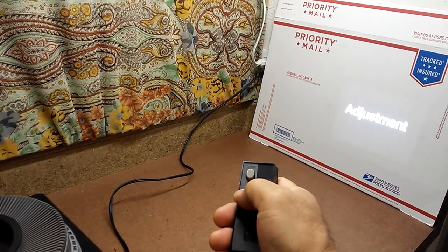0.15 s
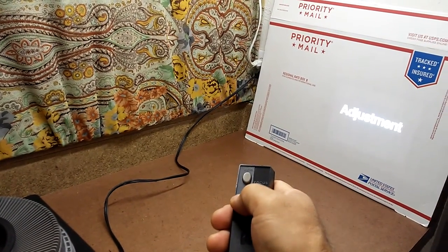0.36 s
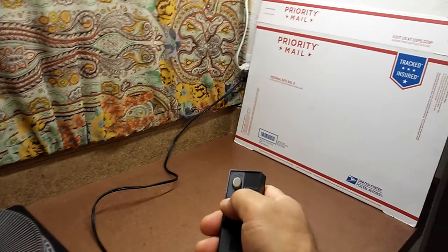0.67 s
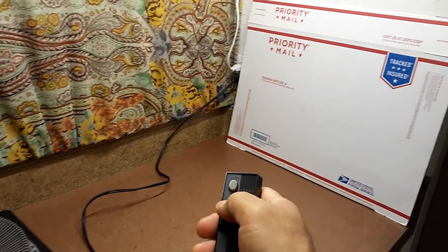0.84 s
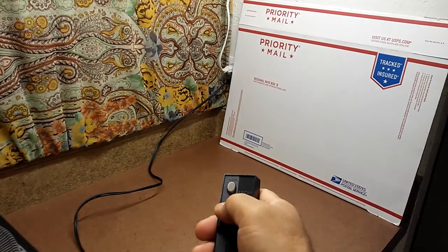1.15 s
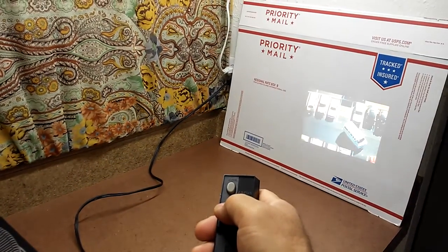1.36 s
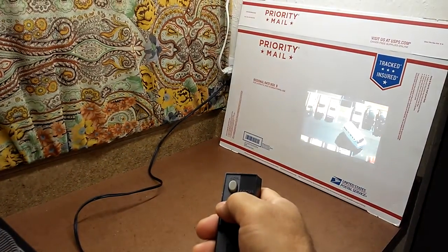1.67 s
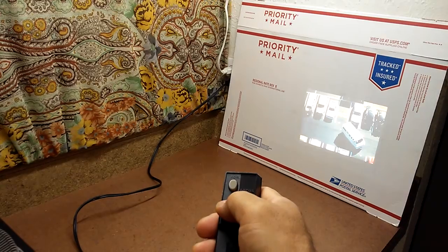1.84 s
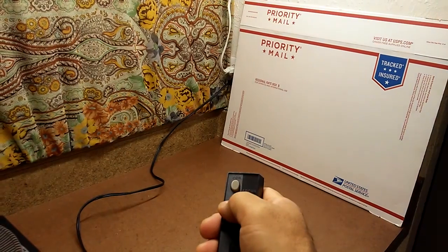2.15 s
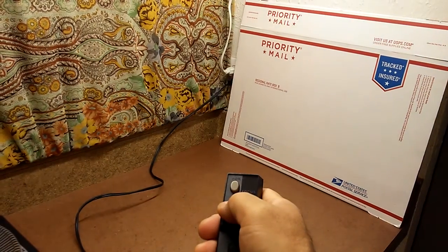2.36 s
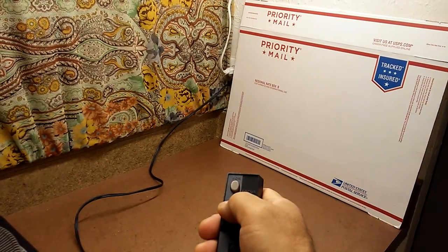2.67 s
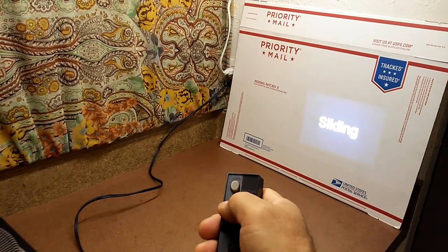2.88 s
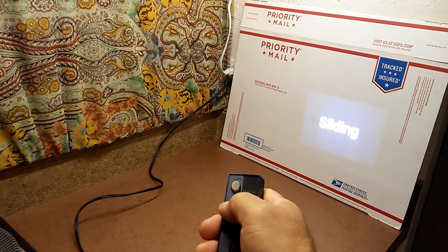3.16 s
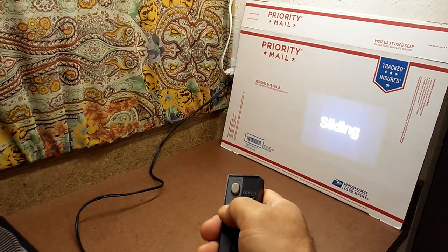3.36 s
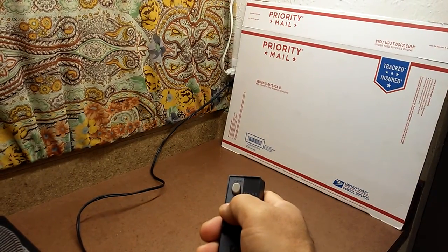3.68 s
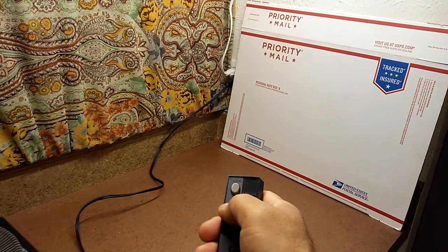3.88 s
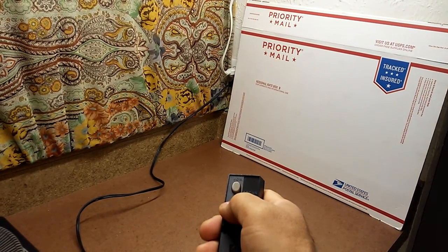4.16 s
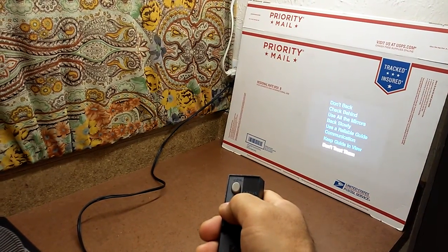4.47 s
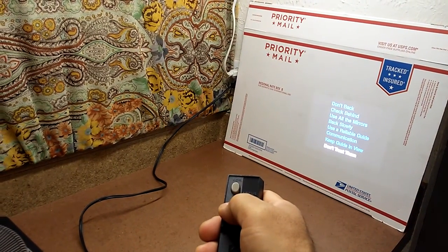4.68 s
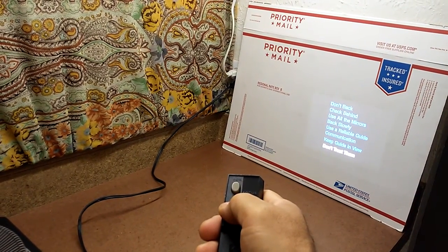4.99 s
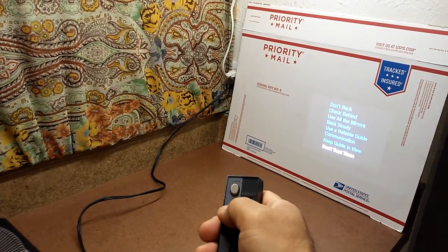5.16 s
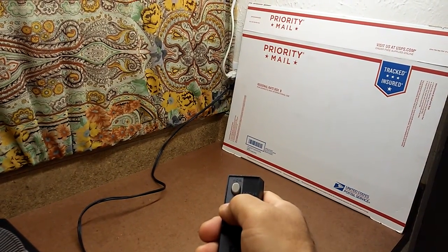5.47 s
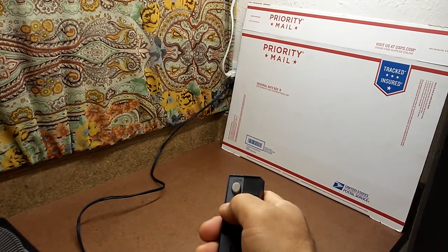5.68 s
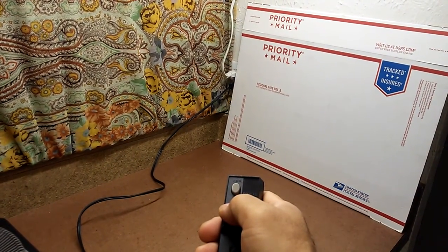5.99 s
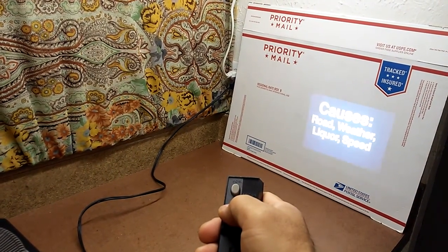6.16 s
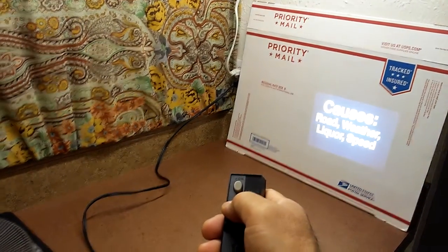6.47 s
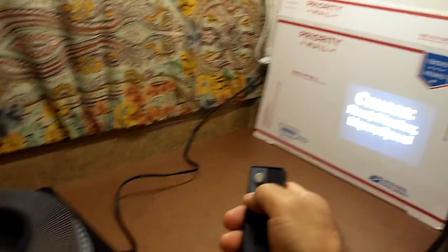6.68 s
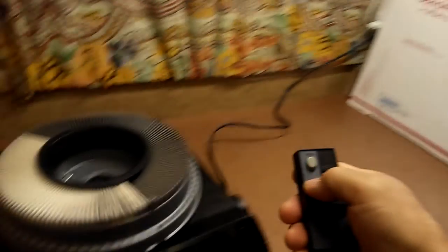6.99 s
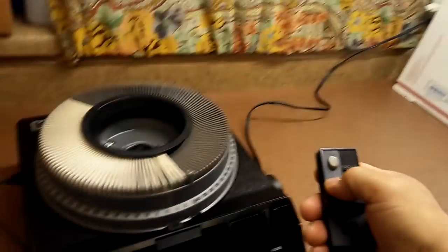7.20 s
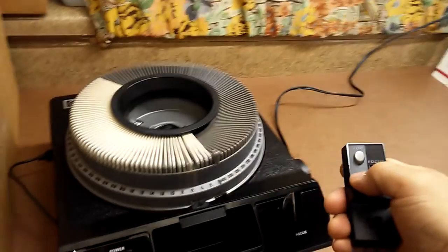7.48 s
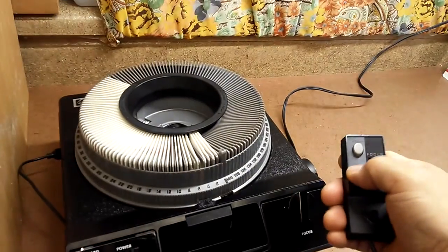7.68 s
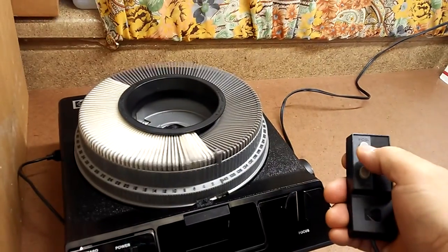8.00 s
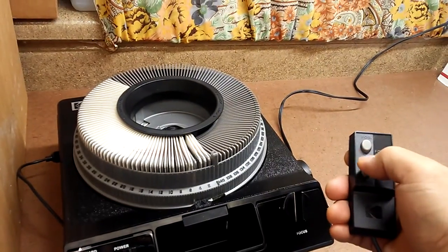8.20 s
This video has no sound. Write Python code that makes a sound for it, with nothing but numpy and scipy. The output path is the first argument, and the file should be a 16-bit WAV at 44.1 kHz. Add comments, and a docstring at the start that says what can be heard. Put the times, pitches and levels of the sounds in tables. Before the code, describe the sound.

Five mechanical slide changes go clack-clack, rattle, snap in a small furnished room, while a cooling fan whirs and a motor hums underneath.

```python
"""A round-tray slide projector on a desk steps through five slides in a small, furnished room.
Each change: two heavy lever clacks, the old slide landing, the tray bumping, the next slide catching, a bright latch snap.
Contacts are bursts of random clicks through ringing parts, with room echoes; a cam train grumbles beneath them.
Filtered noise makes the fan air and wavering sines the hum; near the end the microphone turns to face them."""
import sys
import numpy as np
from scipy import signal
from scipy.fft import rfft, irfft
from scipy.io import wavfile
from scipy.ndimage import uniform_filter1d

SR = 44100
rng = np.random.default_rng(int(sys.argv[2]) if len(sys.argv) > 2 else 0)


def unload_audio(sound):
    """Save the sound as a 16-bit wav file, at the path given as the first command line argument."""
    columns = np.transpose(np.atleast_2d(sound))
    # keep every value between -1 and 1, then stretch to whole-number steps
    steps = np.round(np.clip(columns, -1, 1) * 32767)
    wavfile.write(sys.argv[1], SR, steps.astype(np.int16))


N = 367794

# main beats of each slide change: shutter_clack_s, lifter_clack_s, latch_snap_s
CHANGES = [(0.443, 0.645, 1.178), (2.006, 2.183, 2.733), (3.38, 3.539, 4.118), (5.221, 5.398, 5.95),
           (7.579, 7.758, 8.303)]
# how each change differs, all offsets: clack_force_db, jiggle_db, landing_db, tray_bump_db, catch_db, last_knock_db
SLIDES = [(0, -23, -2, -1.5, -0.5, -5), (0.5, -8.5, 1, -1.5, 0.5, -5), (0, 3.5, -8, 1.5, -9.5, 0),
          (0.6, -3.5, -6.5, 1.5, -14, -6), (1.5, 1.5, 1.5, -5, -11, -3)]
# resonances of the plastic housing: pitch_hz, width_hz, level_db
HOUSING = [(431.6, 19, 9.5), (558, 23, 9), (905, 41, -4), (1190, 45, 0), (1580, 82, -6), (2070, 66, -4),
           (2630, 240, -9), (2870, 45, -2)]
# click colour of light plastic and linkage contacts: frequency_hz, density_db (per Hz)
RATTLE_TONE = [(70, -19.5), (170, -12), (260, 12), (350, 1.5), (580, 8), (850, 1.5), (1150, -3.5),
               (1600, 3), (2200, -1), (3000, -3), (4000, -8.5), (9500, -7), (12000, -11.5), (16000, -25)]
# click colour of a slide mount's contacts: frequency_hz, density_db (per Hz)
MOUNT_TONE = [(100, -18), (500, -10), (1000, -3.5), (1600, 0), (2300, -12), (3300, -6), (5000, 1.5),
              (9000, -8), (16000, -17)]
HOUSING_DB = -12  # ring of the housing against its click
THUMP_HZ, EDGE_HZ = 800, 3500  # a contact's thump lies below, its sharp edge above


def amp(db):
    """Decibels to gain."""
    return 10 ** (np.asarray(db) / 20)


def rms(x):
    """Root mean square."""
    return np.sqrt(np.mean(x ** 2) + 1e-20)


def read(points, hz):
    """A table of frequency and value, joined by lines on a log frequency axis."""
    f, value = np.transpose(points)
    return np.interp(np.log(hz + 1), np.log(f + 1), value)


def add(mix, s, sound):
    """Lays a sound into the mix at time s."""
    part = mix[max(round(s * SR), 0):][:len(sound)]
    part += sound[:len(part)]


def drift(hz):
    """Slow random motion of unit rms, fading out smoothly above about hz."""
    f = np.fft.rfftfreq(N, 1 / SR)
    x = irfft(rfft(rng.standard_normal(N)) * np.exp(-(f / hz) ** 2), N)
    return x / rms(x)


def band(x, hz, kind):
    """A causal band filter."""
    return signal.sosfilt(signal.butter(3, hz, kind, fs=SR, output="sos"), x)


def response(tone, modes, ring_db, size=8192):
    """One contact: a short coloured click, and the resonances that it leaves ringing."""
    tone_db = read(tone, abs(np.fft.fftfreq(size, 1 / SR)))
    log_gain = np.log(amp(np.maximum(tone_db, -80)))
    # minimum phase packs the click's energy at its start
    click = np.fft.ifft(np.exp(np.conj(signal.hilbert(log_gain)))).real
    t = np.arange(size) / SR
    ring = np.zeros(size)
    for hz, width, db in modes:
        ring += amp(db) * width * np.exp(-np.pi * width * t) * np.cos(2 * np.pi * hz * t)
    return click / rms(click) + amp(ring_db) * ring / rms(ring)


def contacts(size, per_s, uneven_db):
    """Tiny impacts at random moments, of random sign and strength."""
    hit = rng.random(size) < per_s / SR
    sign = rng.choice([-1, 1], size)
    strength = np.clip(rng.standard_normal(size), -2, 2)
    return hit * sign * amp(uneven_db * strength)


def blow(body, db, thump_db, edge_db, rise, decay, per_s, uneven_db, lag=0, size=11000):
    """Loose parts chatter in a burst that swells and dies; the lower bands follow the edge by lag seconds.

    Thump and edge levels are relative to the middle band; rise and decay are in seconds."""
    t = np.arange(size) / SR
    force = (1 - np.exp(-(t / rise) ** 2)) * np.exp(-t / decay)
    force /= force.max()
    sound = signal.fftconvolve(force * contacts(size, per_s, uneven_db), body)[:size]
    thump = band(sound, THUMP_HZ, "low")
    middle = band(sound, [THUMP_HZ, EDGE_HZ], "band")
    edge = band(sound, EDGE_HZ, "high")
    out = amp(edge_db) * edge / rms(edge)
    add(out, lag, middle / rms(middle) + amp(thump_db) * thump / rms(thump))
    # a longer burst carries more energy
    return amp(db) * rms(force) * out


def facing():
    """How far the microphone faces the machine, 0-1, at every sample."""
    # turning of the microphone: time_s, share (0-1)
    turns = [(0, 0.03), (.5, 0.2), (1.5, 0.03), (6.4, 0.01), (6.8, 0.11), (7.25, 0.85), (8.3, 1)]
    return np.clip(np.interp(np.arange(N) / SR, *np.transpose(turns)), 0, 1)


def air(tone, db):
    """Fan noise coloured by the vent's resonances; db is its level from 300 Hz up."""
    # resonances of the vent: pitch_hz, width_hz, lift_db
    vent = [(60.7, 38, 20), (810, 460, 4), (564, 34, 4.5), (1200, 26, -3), (4300, 600, 5.5),
            (8880, 1180, 9), (9830, 650, 5.5), (13100, 700, 8)]
    f = np.fft.rfftfreq(N, 1 / SR)
    vent_db = sum(lift_db * np.exp(-(2 * (f - hz) / width) ** 2) for hz, width, lift_db in vent)
    x = irfft(rfft(rng.standard_normal(N)) * amp(read(tone, f) + vent_db), N)
    return amp(db) * x / rms(band(x, 300, "high"))


def motor():
    """Fan air fluttering slightly over wavering hum lines, both stronger once the microphone faces them."""
    # fan air with the microphone turned away, then facing: frequency_hz, density_db (per Hz)
    away_tone = [(20, -42), (55, -16.5), (100, -8), (190, -10), (260, 1.5), (570, 0.5), (950, -8.5),
                 (1150, -9), (1450, -10.5), (3400, -17.5), (6000, -21.5), (9000, -22.5), (10800, -26),
                 (16000, -34.5)]
    facing_tone = [(20, -52), (60, -20), (150, -16), (260, -3.5), (330, -12.5), (510, -3.5), (630, -36),
                   (800, -11.5), (1080, -7), (1500, -21), (2200, -17.5), (3500, -27), (8800, -26),
                   (11000, -30), (16000, -42)]
    # lines of the motor and the fan blades, one list each: pitch_hz, level_db, gain_when_faced_db
    hum_hz = [120, 175, 240, 1092, 1160, 1280]
    hum_db = [-56, -59, -49.5, -67, -56.5, -68]
    hum_facing_db = [1, 5.5, 6, 15.5, 0, 8]
    flutter_db, waver_db, wobble_rad = .3, .6, .12  # rms swing of air level, hum level and hum phase

    t, faced = np.arange(N) / SR, facing()
    wind = np.sqrt(1 - faced) * air(away_tone, db=-46)
    wind += np.sqrt(faced) * air(facing_tone, db=-44)
    hum = np.zeros(N)
    for hz, db, faced_db in zip(hum_hz, hum_db, hum_facing_db):
        gain = amp(db + faced_db * faced + waver_db * drift(hz=6.1))
        hum += gain * np.sin(2 * np.pi * hz * t + wobble_rad * drift(hz=3.9))
    # a sine's peak is sqrt(2) times its rms
    return wind * amp(flutter_db * drift(hz=22)) + np.sqrt(2) * hum


def eddies(level_db=-55, gusty_db=5.5, faced_db=-6):
    """The fan's outflow flutters in brief, hollow puffs, weaker once the microphone has turned."""
    puffs = band(rng.standard_normal(N), [460, 640], "band") * amp(gusty_db * drift(hz=25))
    return amp(level_db + faced_db * facing()) * puffs / rms(puffs)


def cam(scrape_db=-49, grumble_db=-44, ticks_db=-53):
    """Gears grumble and scrape unevenly, and loose mounts tick, for as long as a change lasts."""
    run_up_s, run_on_s = 0.0086, 0.31  # before the shutter clack, after the snap
    t = np.arange(N) / SR
    running = np.zeros(N)
    for shutter_s, _, snap_s in CHANGES:
        running += (t > shutter_s - run_up_s) & (t < snap_s + run_on_s)
    # soften the starts and stops
    running = uniform_filter1d(running, size=3000)

    gears = response(RATTLE_TONE, HOUSING, HOUSING_DB)
    scrape = signal.oaconvolve(contacts(N, per_s=2500, uneven_db=4), gears)[:N]
    scrape = scrape * amp(2.4 * drift(hz=28))
    grumble = band(scrape, [270, 750], "band")
    mounts = response(MOUNT_TONE, HOUSING, HOUSING_DB)
    ticks = signal.oaconvolve(contacts(N, per_s=110, uneven_db=1), mounts)[:N]
    layers = [(scrape_db, scrape), (grumble_db, grumble), (ticks_db, ticks)]
    return running * sum(amp(db) * x / rms(x) for db, x in layers)


def levers(shutter_db=-21, lifter_db=-21.0, slack_db=-44, slack_s=0.011,
           rebound_db=-41, rebound_s=.058, shudder_db=-35, shudder_s=.038):
    """The shutter ticks through its slack, slams and rebounds; then the lifter slams on its stop and shudders."""
    # click colour of the heavy levers: frequency_hz, density_db (per Hz)
    clack_tone = [(60, -18), (110, -6.5), (160, -9), (205, -5), (250, 10.5), (330, 3.5), (540, 5), (660, 2),
                  (900, -0.5), (1600, -1), (2500, -5.5), (9500, -4.5), (13500, -13.5), (16000, -21)]
    body, out = response(clack_tone, HOUSING, HOUSING_DB), np.zeros(N)
    for (shutter_s, lifter_s, _), (force_db, *_) in zip(CHANGES, SLIDES):
        slack = blow(body, slack_db, thump_db=-3, edge_db=4,
                     rise=0.0013, decay=0.0051, per_s=13000, uneven_db=-1)
        add(out, shutter_s - slack_s, slack)
        slam = blow(body, shutter_db + force_db, thump_db=-0.6, edge_db=-0.6,
                    rise=.016, decay=.012, per_s=7000, uneven_db=2.5)
        add(out, shutter_s, slam)
        rebound = blow(body, rebound_db, thump_db=0.5, edge_db=4,
                       rise=0.012, decay=.011, per_s=1000, uneven_db=5.5)
        add(out, shutter_s + rebound_s, rebound)
        stop = blow(body, lifter_db + force_db, thump_db=-1, edge_db=0.1,
                    rise=0.01, decay=0.012, per_s=7000, uneven_db=2.5)
        add(out, lifter_s, stop)
        shudder = blow(body, shudder_db, thump_db=-6, edge_db=-9,
                       rise=0.0088, decay=0.0098, per_s=1200, uneven_db=8.0)
        add(out, lifter_s + shudder_s, shudder)
    return out


def landings(jiggle_db=-33, jiggle_after_s=.088, land_db=-30, land_before_s=.379):
    """The old slide jiggles on the housing as it is lifted, then skitters to rest in its slot, ringing hollow."""
    # resonances of a slide mount: pitch_hz, width_hz, level_db
    mount = [(1540, 180, -4), (2310, 140, 9), (3024, 67, -2.5)]
    guide = response(MOUNT_TONE, HOUSING, HOUSING_DB)
    slot = response(MOUNT_TONE, mount, ring_db=-3)
    out = np.zeros(N)
    for (_, lifter_s, snap_s), (_, loose_db, fall_db, *_) in zip(CHANGES, SLIDES):
        jiggle = blow(guide, jiggle_db + loose_db, thump_db=-18, edge_db=-12,
                      rise=0.0033, decay=0.024, per_s=900, uneven_db=3.5)
        add(out, lifter_s + jiggle_after_s, jiggle)
        landing = blow(slot, land_db + fall_db, thump_db=-6, edge_db=-9.5,
                       rise=0.0056, decay=0.017, per_s=1500, uneven_db=1.5)
        add(out, snap_s - land_before_s, landing)
    return out


def tray(bump_db=-38, bump_before_s=.39, knock_db=-37, knock_after_s=.23, brightening=1.0):
    """Hollow thumps: the tray bumps as it steps on, and the cam knocks home, brighter when harder."""
    # resonances of the hollow tray: pitch_hz, width_hz, level_db
    hollow = [(352, 70, -8), (590, 130, 6)]
    body, out = response(RATTLE_TONE, hollow, ring_db=-3), np.zeros(N)
    for (_, _, snap_s), (*_, step_db, _, home_db) in zip(CHANGES, SLIDES):
        bump = blow(body, bump_db + step_db, thump_db=10.5, edge_db=-6,
                    rise=0.0016, decay=0.011, per_s=3500, uneven_db=0.0)
        add(out, snap_s - bump_before_s, bump)
        knock = blow(body, knock_db + home_db, thump_db=10.5, edge_db=brightening * home_db,
                     rise=0.0035, decay=0.015, per_s=3500, uneven_db=2.5)
        add(out, snap_s + knock_after_s, knock)
    return out


def rattles():
    """Light linkage chatters at fixed points of the cam's turn, before and after the snap."""
    # the same figure in every change, thump and edge relative to the middle band:
    # after_snap_s, level_db, thump_db, edge_db, rise_s, decay_s
    figure = [(-.302, -44.5, -7, 3.5, 0.0037, 0.0087), (-.279, -46, -14, -2.5, 0.008, 0.017),
              (-.15, -49, -6, 10, 0.012, .011), (-.13, -31.5, -2, -1, 0.0037, 0.018),
              (-.118, -30.5, -5.5, -14, 0.005, 0.014), (.07, -31.5, -10, 2, 0.0044, 0.014),
              (.121, -28, 1, -1, .005, .012), (.136, -26.5, 0, 1, 0.01, 0.013),
              (.183, -44, 7.5, 0.5, .008, 0.033)]
    body, out = response(RATTLE_TONE, HOUSING, HOUSING_DB), np.zeros(N)
    for _, _, snap_s in CHANGES:
        for after_s, db, thump_db, edge_db, rise, decay in figure:
            chatter = blow(body, db, thump_db, edge_db, rise, decay, per_s=2200, uneven_db=4.5)
            add(out, snap_s + after_s, chatter)
    return out


def catches(level_db=-32, before_s=.125, again_db=-33, again_s=.037):
    """The next slide catches on its way down with a thump, then knocks once more as it slips free."""
    body, out = response(RATTLE_TONE, HOUSING, HOUSING_DB), np.zeros(N)
    for (_, _, snap_s), (*_, catch_db, _) in zip(CHANGES, SLIDES):
        s = snap_s - before_s
        thump = blow(body, level_db + catch_db, thump_db=8.5, edge_db=1,
                     rise=.007, decay=0.014, per_s=3000, uneven_db=4.5)
        add(out, s, thump)
        knock = blow(body, again_db + catch_db, thump_db=0.5, edge_db=0,
                     rise=0.0036, decay=.011, per_s=3000, uneven_db=5.0)
        add(out, s + again_s, knock)
    return out


def latch(level_db=-26, thump_db=-5, edge_db=12):
    """A steel spring catch: a sudden, bright, briefly ringing snap."""
    # click colour of the snap: frequency_hz, density_db (per Hz)
    snap_tone = [(100, -43), (250, -12), (600, -27), (1050, -10), (1600, -2), (2300, -1), (2900, -3.5),
                 (4200, -2.5), (7300, -10.5), (8900, -1), (10300, 1), (11500, -7.5), (13000, -4),
                 (16000, -23)]
    # resonances of the steel latch: pitch_hz, width_hz, level_db
    steel = [(2920, 110, -3), (4220, 20, -24), (5440, 99, 6), (5430, 100, -27), (6180, 81, 9),
             (8200, 55, -15), (8600, 46, -1), (9220, 210, 15.5), (9400, 160, 2), (10800, 42, -18),
             (11400, 43, -24), (12200, 69, 2)]
    body, out = response(snap_tone, steel, ring_db=-9), np.zeros(N)
    for _, _, snap_s in CHANGES:
        snap = blow(body, level_db, thump_db, edge_db,
                    rise=0.003, decay=0.011, per_s=8000, uneven_db=5, lag=.003)
        add(out, snap_s, snap)
    return out


def scattered(x, paths, wander_s=.045):
    """Contacts land at ever different spots, so they reach the microphone by each set of echoes in turn."""
    angle = np.pi * np.arange(N) / SR / wander_s
    out = np.zeros(N)
    for k, path in enumerate(paths):
        share = np.sqrt(2 / len(paths)) * np.cos(angle + np.pi * k / len(paths))
        out += signal.oaconvolve(x * share, path)[:N]
    return out


def room(x, wet_db, first_s, count=16, channels=3):
    """A few quick echoes off the desk and the cardboard screen, then a dense tail whose bass lasts longest."""
    # decay of the furnished room: frequency_hz, t60_s
    decay = [(200, 0.35), (550, 0.23), (1400, 0.26), (3700, 0.21), (10000, 0.12), (16000, 0.24)]
    near = np.zeros((channels, round(.008 * SR)))  # echoes within 8 ms
    for path in near:
        spots = rng.integers(len(path) // 10, len(path), count)
        path[spots] = rng.choice([-1, 1], count) / np.sqrt(count)
    # small surfaces throw back only the shorter waves
    x = x + amp(-7) * band(scattered(x, near), THUMP_HZ, "high")

    size = SR // 2
    taps = rng.standard_normal((channels, size)) * (np.arange(size) / SR > first_s)
    hz, t, z = signal.stft(taps, SR, nperseg=256)
    # 60 dB down after each frequency's t60
    fade = np.exp(-np.log(1000) * t / read(decay, hz)[:, None])
    tails = signal.istft(z * fade, SR)[1]
    tails /= np.linalg.norm(tails, axis=1, keepdims=True)
    return x + amp(wet_db) * scattered(x, tails)


def scene():
    """The changing mechanism in the room, over the running motor and fan."""
    heavy = room(levers(), wet_db=-6, first_s=.004)
    light = room(rattles() + catches() + landings() + tray() + cam(), wet_db=-8.5, first_s=0.0021)
    snaps = room(latch(), wet_db=-9.5, first_s=0.0047)
    return (heavy + light + snaps + motor() + eddies())[None]


def record(dry):
    """The recorder's band limit: a steep low-pass at 16050 Hz."""
    lowpass = signal.firwin(511, 16050, window=("kaiser", 9), fs=SR)
    return signal.oaconvolve(dry, lowpass[None], "same")


dry = scene()
out = record(dry)
unload_audio(out)
```